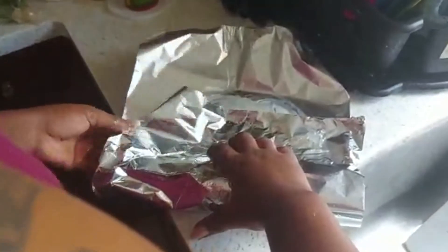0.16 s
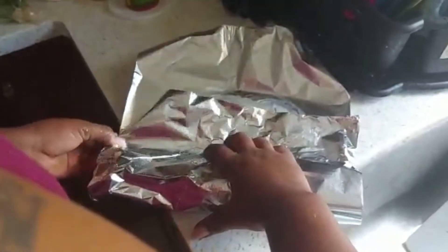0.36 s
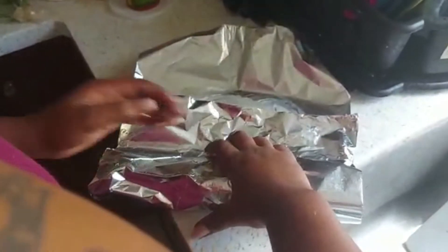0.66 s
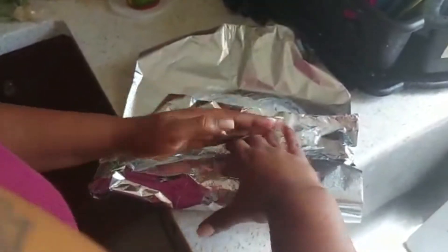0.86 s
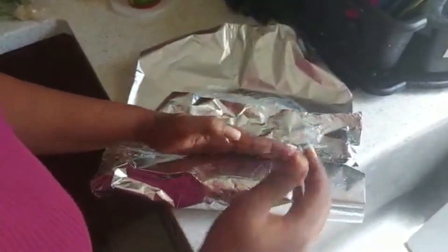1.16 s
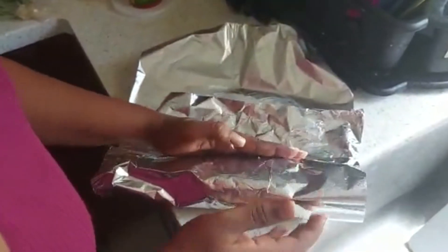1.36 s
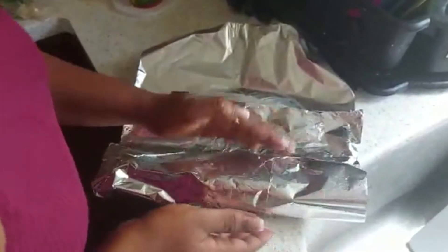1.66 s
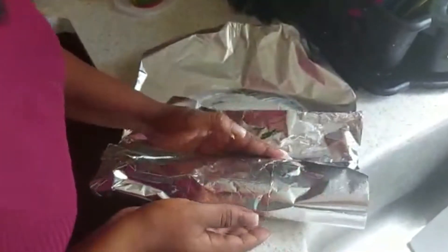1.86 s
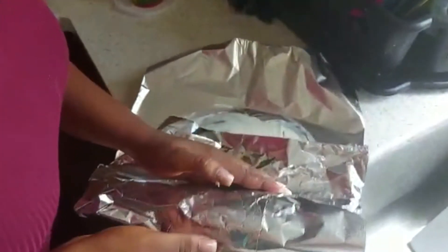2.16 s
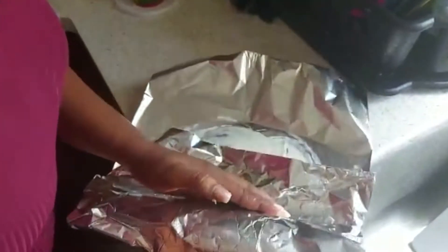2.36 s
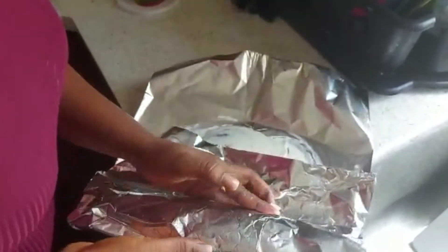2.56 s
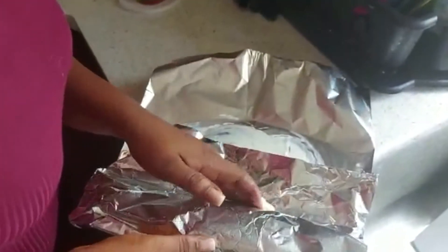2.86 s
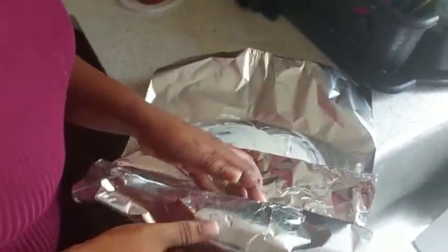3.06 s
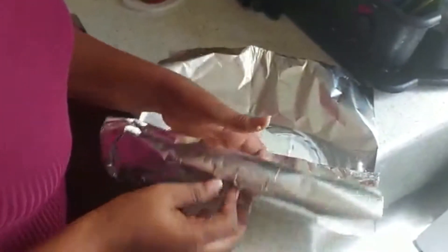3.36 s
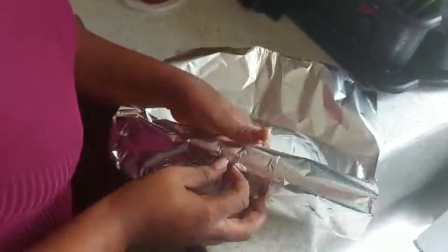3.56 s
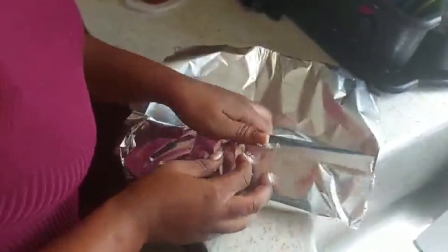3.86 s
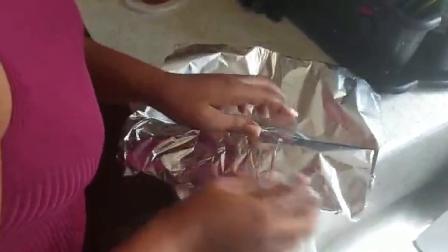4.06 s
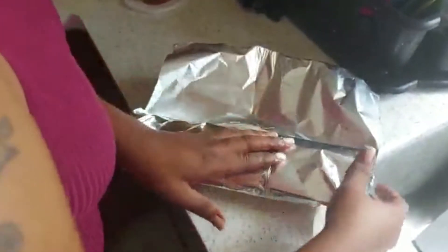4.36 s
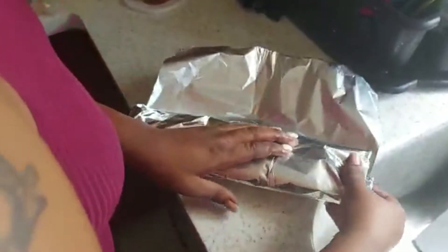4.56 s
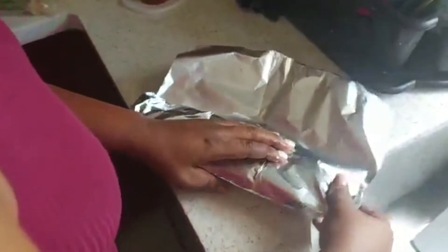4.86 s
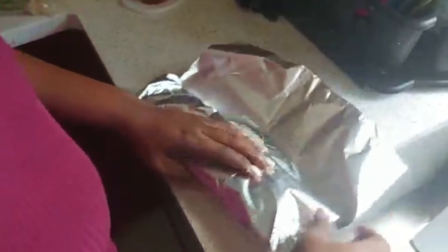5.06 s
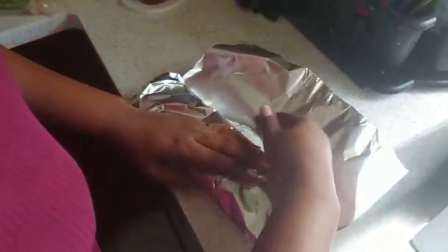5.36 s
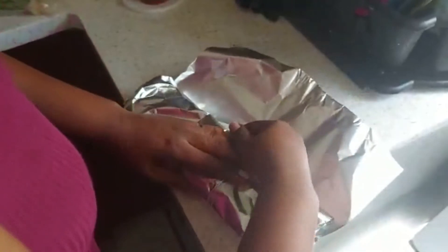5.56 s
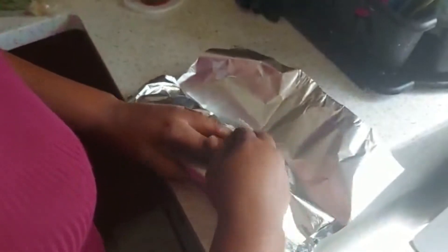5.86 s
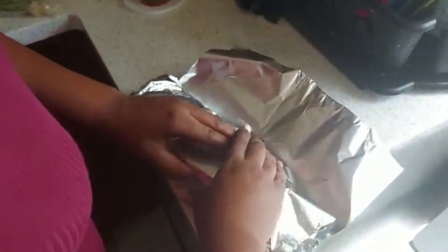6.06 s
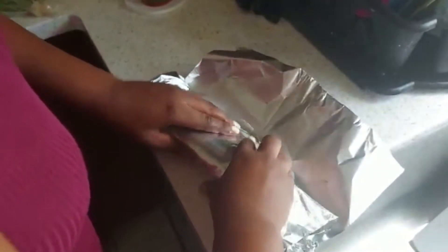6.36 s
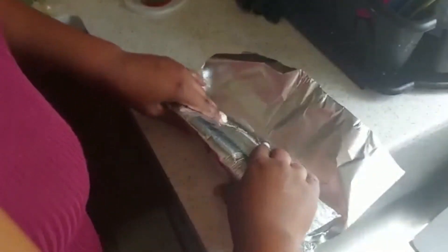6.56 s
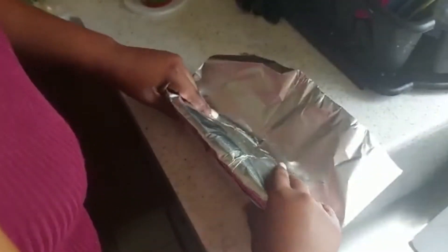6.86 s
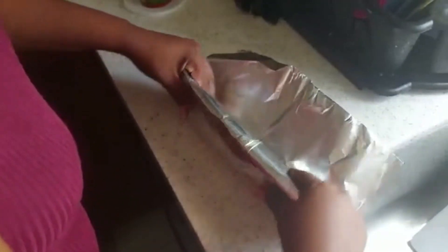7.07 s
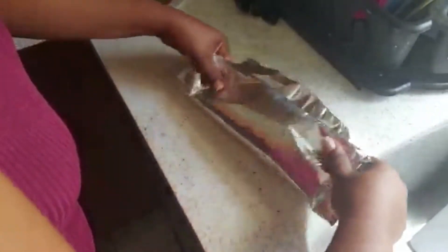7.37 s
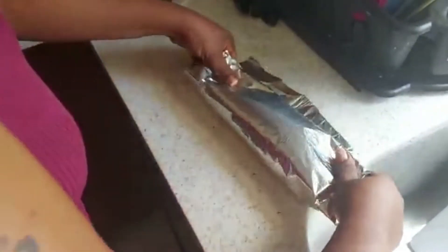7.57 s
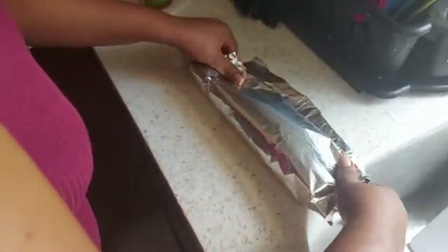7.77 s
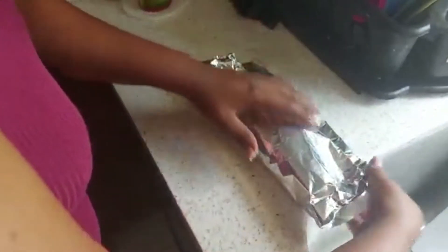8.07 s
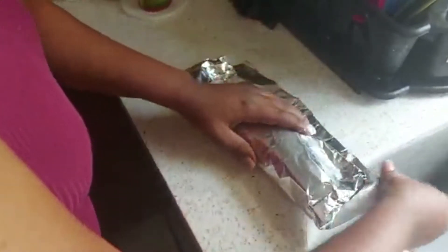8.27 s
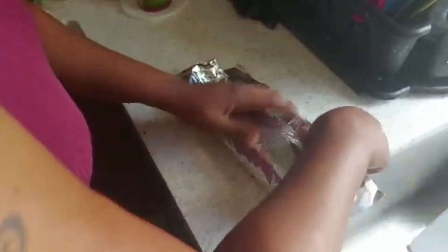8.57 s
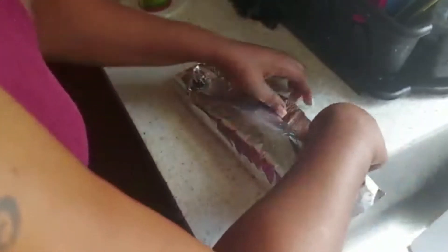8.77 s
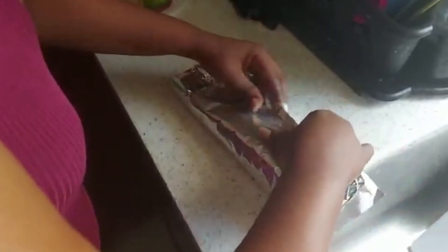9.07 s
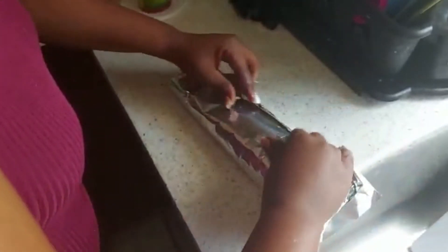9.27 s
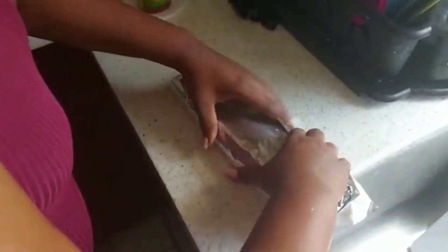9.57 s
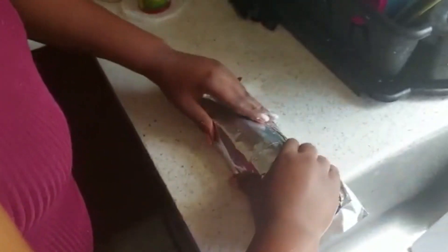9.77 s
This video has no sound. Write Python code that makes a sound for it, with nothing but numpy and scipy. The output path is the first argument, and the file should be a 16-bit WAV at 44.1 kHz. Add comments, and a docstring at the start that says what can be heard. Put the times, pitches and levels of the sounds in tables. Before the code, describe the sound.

Crisp aluminium foil crackles in irregular bursts as hands fold and crimp it in a small kitchen, over a faint low appliance hum.

```python
"""Crimping foil around food

Two hands fold and crimp aluminium foil on a plate in a small kitchen; the plate knocks once on the counter.
Foil: random flips and single impulses, each a tick plus dying noise, through facet resonances.
Plate: decaying sine modes and filtered noise. Appliance: resonant noise, two sines and a soft rush.
A low rumble of band noise swells twice, sinking in pitch each time. Foil and plate echo off the walls."""
import sys
import numpy as np
from scipy import signal
from scipy.fft import rfft, irfft
from scipy.io import wavfile
from scipy.ndimage import uniform_filter1d

SR = 44100
rng = np.random.default_rng(int(sys.argv[2]) if len(sys.argv) > 2 else 0)


def wav_record(signal):
    """Record a signal, one row per channel, as 16-bit PCM in the file named by sys.argv[1]."""
    frames = np.transpose(np.atleast_2d(signal))
    bounded = np.clip(frames, -1, 1)
    # unit amplitude maps onto the largest positive 16-bit level
    quanta = np.round(bounded * 32767).astype(np.int16)
    wavfile.write(sys.argv[1], SR, quanta)


N = 437913

# Presses and pinches of the fingers on the foil. Each row: start in seconds, length in seconds,
# crackle level in dB before band trims, finest wrinkles in dB relative to the crackle.
FINGER_PRESSES = [(0.0, 0.083, -37.5, -2.5), (0.057, 0.42, -36.5, -0.5), (0.722, 0.043, -48, -8),
                  (0.843, 0.032, -47, -12), (0.957, 0.082, -54.5, -1), (1.127, .1, -43.5, -7.5),
                  (1.231, 0.13, -39.5, -4), (1.55, 0.044, -43.5, 3), (1.708, 0.19, -35.5, -3.5),
                  (1.88, 0.47, -45, -2), (2.273, 0.023, -39, -3), (2.499, 0.12, -43, -0.5),
                  (2.613, 0.083, -40.5, -6), (2.813, 0.16, -51, -7), (3.0, .16, -41, -6),
                  (3.2, 0.33, -46, -1), (3.369, 0.081, -41, -2), (3.477, 0.15, -36.5, -2.5),
                  (3.66, 0.21, -42.5, -4), (3.846, 0.13, -39.5, -1), (3.937, 0.1, -36, -1),
                  (4.308, 0.1, -45.5, -4), (4.387, 0.21, -35, -2.5), (4.7, 0.086, -38.5, -0.5),
                  (4.818, 0.21, -42, -4), (4.995, 0.093, -38.5, -3), (5.109, 0.024, -39, -2),
                  (5.491, 0.064, -42.5, -4.5), (5.652, 0.034, -45.5, -3.5), (5.796, .02, -50, -11),
                  (5.869, 0.077, -43.5, -5.5), (5.974, 0.047, -42.5, -3.5), (6.12, 0.19, -42.5, -6.5),
                  (6.332, 0.29, -36.5, -4), (6.558, .12, -30.5, -6.5), (6.693, 0.12, -40.5, -3),
                  (6.845, 0.083, -37.5, -4), (6.902, 0.36, -37.5, -3.5), (7.237, 0.22, -33.5, -3),
                  (7.392, 0.14, -31.5, -1), (7.536, 0.17, -35, 0.5), (7.726, 0.15, -40.5, -6),
                  (7.864, 0.069, -35.5, 3.5), (8.041, 0.025, -34.5, 1), (8.097, 0.13, -33.5, -2.5),
                  (8.246, .11, -39.5, 0.5), (8.502, 0.084, -45.5, -4), (8.61, 0.096, -38.5, 1),
                  (8.767, 0.13, -47.5, -9), (8.877, 0.043, -34, 0.5), (8.932, 0.39, -41, 0.5),
                  (9.4, 0.066, -45.5, -6), (9.55, 0.15, -37.5, -0.5), (9.619, .15, -32, -7.5),
                  (9.773, 0.078, -36.5, -2.5), (9.879, 0.02, -38, 3)]
# Colour of the sheet. Each row: frequency in Hz, relative gain in dB.
SHEET_COLOUR = [(400, 6.5), (750, 3), (1200, 0), (2200, 1.5), (3000, -0.5), (4300, 5.5), (6000, 5),
                (8000, 1), (9800, 0.5), (12200, 6), (15000, -1.5), (16000, -19)]
# Faint rumble between the swells. Each row: time in seconds, level in dB.
RUMBLE_LEVEL = [(0, -45.5), (.75, -59), (1.2, -48.5), (2.3, -50), (4.2, -61), (4.7, -55), (5.4, -60),
                (6.5, -53), (9, -57), (9.93, -47)]
# Rumble swells, a higher one and then a deeper one. Each row: start in seconds, length in seconds,
# level in dB, nominal centre in Hz.
RUMBLE_SWELLS = [(1.554, 0.3, -40, 119), (1.88, 0.45, -52, 65), (8.024, 0.32, -39.5, 116),
                 (8.524, 0.24, -45, 60)]
# Hum resonances of the appliance. Each row: frequency in Hz, width of each of two passes in Hz, level in dB.
HUM_RESONANCES = [(296.8, 27.3, -53), (304, 78, -53), (440.6, 10.3, -61)]
# Deep motor drone. Each row: time in seconds, level in dB before trim and wander.
MOTOR_DRONE = [(0, -52), (.9, -59), (1.5, -49), (2.2, -59), (2.7, -50.5), (3.8, -53), (5.8, -63),
               (6.9, -54), (7.7, -58), (9.93, -59)]
# Colour of the soft rush. Each row: frequency in Hz, relative gain in dB.
RUSH_COLOUR = [(15, -52), (25, -7.5), (70, -13), (130, -4.5), (212, -10), (236, -5.5), (301, -4), (394, -9),
               (641, -11.5), (695, -16.5), (911, -14), (1370, -17), (4030, -21), (4610, -21), (16000, -36)]
# Single creases snapping through. Each row: time in seconds, energy in dB before trim, pitch in Hz,
# shimmer of the sheet in dB relative to the tick.
CREASE_SNAPS = [(0.069, 1, 6200, 12), (0.2908, 4, 5450, 5), (0.728, -8, 5440, 14), (0.9697, -5, 4140, 12),
                (1.0745, -8.5, 5500, 12), (1.233, 2, 4800, 10), (1.3371, 9.5, 11500, 12),
                (1.7535, 12.5, 6960, 12), (2.5103, -16, 4660, 11), (2.619, 3.5, 4560, 8),
                (2.824, -1, 4200, 8), (2.852, -4, 5450, 2), (2.99, 4, 4370, 5), (3.0085, 4, 4700, 7),
                (3.2054, 0, 6200, 12), (3.247, 0.5, 4900, 8), (3.2997, -8, 4800, -5),
                (3.4087, 4.5, 6100, 5), (3.866, -1, 11800, 10), (4.3956, -1, 11700, 14),
                (4.4105, 2.5, 4800, 14), (4.664, 1.5, 5470, 0), (4.6892, 3, 5500, -2),
                (4.758, 3, 12400, 12), (4.9278, -0.5, 4760, 7), (4.9722, 2, 11700, 10),
                (5.011, 3.5, 5500, 17), (5.1146, 4, 6160, 15), (5.494, -18, 4100, 5), (5.677, -11, 6060, 6),
                (5.8045, -6, 4550, 9), (5.873, -5, 12400, 5), (6.1344, -1.5, 11900, -2),
                (6.2597, 2.5, 12400, 3), (6.52, 4, 7500, 5), (6.854, -2.5, 5500, 9), (7.0916, 1, 5450, -3),
                (7.8313, 3, 4800, 6), (7.8896, 3, 5500, 12), (8.0514, 10, 6760, 13), (8.11, 8, 11900, 13),
                (8.1765, 3, 6140, -1), (8.492, -12, 11800, 10), (8.615, 1.5, 5030, 11),
                (8.7024, 4, 11700, 11), (8.882, 3, 12100, 10), (8.9808, 8, 6100, 7), (9.0623, 2, 11900, 8),
                (9.0975, 3, 4770, -6), (9.409, -1, 4760, 10), (9.546, -3, 6900, 10), (9.6418, 11, 5240, 13),
                (9.685, 6, 6200, 6), (9.8837, 1.5, 6900, 1)]
# Creases running across the sheet. Each row: start in seconds, level in dB before trim,
# decay time constant in seconds, pitch in Hz.
CREASE_RUNS = [(.075, -22, 0.021, 8100), (.143, -26, 0.015, 8000), (.202, -27, 0.013, 7000),
               (1.338, -19.5, .013, 11500), (1.563, -20, .011, 12500), (1.569, -17.5, 0.017, 8900),
               (1.748, -16, 0.012, 7600), (1.769, -18.5, 0.021, 6700), (3.125, -28, 0.018, 9900),
               (6.608, -25.5, 0.026, 7950), (6.947, -26, .012, 12000), (7.268, -19, 0.013, 11700),
               (7.403, -23, .02, 11000), (7.434, -23, 0.034, 10000), (8.259, -26, .016, 11500),
               (8.349, -25, 0.01, 11000), (9.06, -30, 0.008, 9900), (9.146, -27.5, 0.018, 10000),
               (9.213, -24, 0.0083, 6400)]
# Broad panels popping under the fingers. Each row: time in seconds, level in dB before trim, pitch in Hz.
PANEL_POPS = [(.307, -21.5, 1600), (1.757, -25, 1820), (2.296, -24, 2280), (2.914, -32, 2000),
              (3.007, -26, 1890), (3.205, -31, 1300), (3.614, -28, 1700), (5.114, -26.5, 1620),
              (6.437, -27, 1730), (6.481, -21, 1490), (6.571, -25, 710), (6.809, -25.5, 1790),
              (7.334, -19.5, 1730), (8.526, -25.5, 328), (8.53, -29.5, 1100), (8.788, -25, 1160),
              (9.11, -25, 2270), (9.603, -27, 1900), (9.65, -19, 1800), (9.687, -26, 1290)]
# Contacts of the plate with the counter. Each row: time in seconds, strength in dB.
PLATE_CONTACTS = [(8.053, -28.5), (8.058, -22.5), (8.062, -26.5), (8.068, -26)]
# Plate modes. Each row: frequency in Hz, level in dB relative to the contact, T60 in seconds.
PLATE_MODES = [(347, -18.5, 0.8), (397, 0, 0.25), (452, -11, 0.11), (512, -7.5, 0.37), (575, -25, 0.057),
               (645, -7, 0.3), (716, -25, 0.25), (788, -19, 0.3), (890, -4, 0.099), (1010, -33, 0.11),
               (1090, -21, 0.14), (1660, -27, .12)]

CUTOFF_HZ = 16000
CONTROL_STEP = 40   # samples between points of a slow control
ORDINARY_PRESS_DB = -37.5
PRESS_RISE_SHARE = 0.12   # of the press length
SETTLE_T60_S, SETTLE_T60_PER_LENGTH = .18, .3   # a longer press leaves the foil settling for longer
PANEL_DB, PANEL_FOLLOWS = -44.5, 0.78   # at an ordinary press; share of the press's swing followed
CREASE_TRIM_DB, WRINKLE_TRIM_DB = .5, 2.5
SNAP_TRIM_DB, RUN_TRIM_DB, POP_TRIM_DB = -5.5, 1.0, 5.5
SHIMMER_T60_S = .08
FOIL_PAN_DB, SNAP_PAN_DB, RUN_PAN_DB = 2.0, 2.5, 1.5   # left minus right; snaps at 6 kHz
SNAP_PAN_DB_PER_OCTAVE = 1   # higher snaps lean further to the left
RUN_RISE_SHARE = 0.37   # of the run's decay time
RUMBLE_HZ = 100
DRONE_HZ, DRONE_TRIM_DB = 72.1, -1.5
WHINE_HZ, WHINE_DB = 635.4, -60
RUSH_DB = -46
KITCHEN_T60_S, TREBLE_T60_S = 0.29, 0.28


def from_db(db):
    """Decibels to gain."""
    return np.exp(np.asarray(db) * (np.log(10) / 20))


def rms_one(x):
    """Scale to rms 1."""
    return x / np.sqrt(np.mean(x ** 2) + 1e-20)


def in_time(rows):
    """Curve columns at every sample."""
    s, *columns = np.transpose(rows)
    return [np.interp(np.arange(N) / SR, s, c) for c in columns]


def add(out, sound, s):
    """Mix a short stereo sound in at a time."""
    at = max(0, round(s * SR))
    out[:, at:at + sound.shape[1]] += sound[:, :max(0, N - at)]


def cut(x, hz, kind, order=2):
    """Butterworth filter."""
    sections = signal.butter(order, np.clip(hz, 10, .45 * SR), kind, fs=SR, output="sos")
    return signal.sosfilt(sections, x)


def resonate(x, hz, width_hz):
    """One resonance, gain 1 on top."""
    r = np.exp(-np.pi * width_hz / SR)
    zeros = [(1 - r * r) / 2, 0, (r * r - 1) / 2]
    poles = [1, -2 * r * np.cos(2 * np.pi * hz / SR), r * r]
    return signal.lfilter(zeros, poles, x)


def colour(x, spectrum, size=8192):
    """Causal (minimum-phase) filter with the given spectrum; rms 1."""
    hz, db = np.transpose(spectrum)
    grid_hz = np.maximum(np.arange(size // 2 + 1) * SR / size, 1)
    gain_db = np.interp(np.log(grid_hz), np.log(hz), db)
    cepstrum = irfft(np.log(from_db(gain_db)))
    response = irfft(np.exp(rfft(2 * cepstrum[:size // 2], size)))
    return rms_one(signal.oaconvolve(x, response[None], axes=1)[:, :N])


def panned(pan_db):
    """Left and right gains, for left minus right in dB."""
    return from_db(np.array([[.5], [-.5]]) * pan_db)


def stereo_noise(side_db):
    """White noise, mostly common to both sides."""
    mid, side = rng.standard_normal((2, N))
    return mid + from_db(side_db) * side * [[1], [-1]]


def drift(rate_hz):
    """Slow random wandering of spread 1."""
    r = np.exp(-2 * np.pi * rate_hz * CONTROL_STEP / SR)
    noise = rng.standard_normal(N // CONTROL_STEP + 2002)
    slow = signal.lfilter([1], [1, -2 * r, r * r], noise)[2000:]   # skip the filter's start
    return np.interp(np.arange(N) / CONTROL_STEP, np.arange(len(slow)), rms_one(slow))


def swell(s, length_s, rise_share, release_t60_s):
    """Attack, hold and release, as a gain at every control step."""
    t = np.arange(0, N, CONTROL_STEP) / SR - s
    attack = np.clip(t / (rise_share * length_s), 0, 1)
    return attack * from_db(-60 * np.maximum(t - length_s, 0) / release_t60_s)


def smooth(control):
    """Interpolate a stepped control to every sample."""
    return np.interp(np.arange(N), np.arange(0, N, CONTROL_STEP), control)


def buckle(flips, shimmer_db, t60_s):
    """Each flip is a sharp tick; its energy dies away in the crumpled sheet as a never-repeating shimmer."""
    r = from_db(-120 / (t60_s * SR))   # decay of energy, not amplitude
    energy = signal.lfilter([1 - r], [1, -r], flips ** 2 + 1e-18)
    shimmer = np.sqrt(energy) * rng.standard_normal((2, len(flips)))
    # the tick reaches the left side 0 to 5 samples late
    tick = np.array([np.roll(flips, rng.integers(0, 6)), flips])
    return tick + from_db(shimmer_db) * shimmer


def facet(x, hz, width, broad_db):
    """A facet favours its own pitch and radiates little far below it; white noise keeps its level."""
    hz = min(hz, CUTOFF_HZ)
    gain = np.sqrt(np.pi * width * hz / SR + from_db(2 * broad_db))
    ringing = resonate(x, hz, width * hz) + from_db(broad_db) * x
    return cut(ringing, 0.13 * hz, "high") / gain


def folding(resting_db=-68, resting_wrinkles_db=-75):
    """Crease and wrinkle levels in dB: presses add in energy, and resting hands still stir the foil."""
    creases, wrinkles = from_db(resting_db) ** 2, from_db(resting_wrinkles_db) ** 2
    for s, length_s, db, wrinkle_db in FINGER_PRESSES:
        settle_t60_s = SETTLE_T60_S + SETTLE_T60_PER_LENGTH * length_s
        press = from_db(db) * swell(s, length_s, PRESS_RISE_SHARE, settle_t60_s)
        creases = creases + press ** 2
        wrinkles = wrinkles + (press * from_db(wrinkle_db)) ** 2
    return smooth(10 * np.log10(creases)), smooth(10 * np.log10(wrinkles))


def clumping(clumps_per_s=70, clump_s=.004, between=.14):
    """Flips set each other off, crowding into bursts that start at once and die away; mean 1."""
    starts = (rng.random(N) < clumps_per_s / SR) * rng.uniform(.2, 1, N)
    crowd = signal.lfilter([1], [1, -np.exp(-1 / (clump_s * SR))], starts + 1e-18) + between
    return crowd / crowd.mean()


def crackle(busy_per_s=900, spread_db=3.0, largest=3.23, patchy_db=1.5, count=14):
    """Harder folding buckles more facets; small flips are common and large ones rare."""
    level_db, wrinkle_db = folding()
    effort_db = level_db - ORDINARY_PRESS_DB
    per_s = busy_per_s * from_db(.8 * effort_db) * clumping()
    sizes = from_db(spread_db * np.minimum(rng.exponential(1, N), largest))
    flips = (rng.random(N) < per_s / SR) * sizes * rng.choice([-1, 1], N)
    # the hands feed in energy steadily, so a large burst leaves less for its neighbours
    flips /= np.sqrt(np.abs(uniform_filter1d(flips ** 2, size=1800)) + 0.0014)
    dealt = rng.integers(0, count, N)
    sheet = np.zeros((2, N))
    for k, hz in enumerate(np.linspace(np.sqrt(1100), np.sqrt(15000), count) ** 2):
        # the fingers favour now this size of facet, now that one
        mine = flips * (dealt == k) * from_db(patchy_db * drift(20.5))
        buckled = buckle(mine, shimmer_db=5.5, t60_s=SHIMMER_T60_S)
        sheet += facet(buckled, hz, width=0.27 * np.sqrt(4000 / hz), broad_db=-12.5)
    sheet = colour(sheet, SHEET_COLOUR)
    panels = rms_one(cut(cut(sheet, 2580, "low", order=4), 350, "high"))
    panels = panels * from_db(PANEL_DB + PANEL_FOLLOWS * effort_db)
    creases = rms_one(cut(sheet, [2800, 8000], "band", order=4))
    creases = creases * from_db(level_db + CREASE_TRIM_DB)
    wrinkles = rms_one(cut(sheet, 9000, "high", order=4))
    wrinkles = wrinkles * from_db(wrinkle_db + WRINKLE_TRIM_DB) * panned(2.7)
    return (panels + creases + wrinkles) * panned(FOIL_PAN_DB)


def rumble_band(hz):
    """Nearly mono noise in a low band; rms 1."""
    return rms_one(cut(stereo_noise(-20), [0.56 * hz, 1.35 * hz], "band", order=3))


def rumble():
    """Faint low band noise that swells now and then, higher first and deeper after."""
    level_db, = in_time(RUMBLE_LEVEL)
    out = from_db(level_db) * rumble_band(RUMBLE_HZ)
    for s, length_s, db, hz in RUMBLE_SWELLS:
        envelope = smooth(swell(s, length_s, rise_share=0.3, release_t60_s=0.54))
        out += from_db(db) * envelope * rumble_band(hz)
    return out * panned(-3.1)


def motor_hum(waver_hz=0.9):
    """A motor's wavering drone and whine as sines, and narrow hum resonances driven by noise."""
    drive, (drone_db,) = stereo_noise(-15.0), in_time(MOTOR_DRONE)
    hum = np.zeros((2, N))
    for hz, width_hz, db in HUM_RESONANCES:
        hum += from_db(db) * rms_one(resonate(resonate(drive, hz, width_hz), hz, width_hz))
    for hz, db in ((DRONE_HZ, drone_db + DRONE_TRIM_DB), (WHINE_HZ, WHINE_DB)):
        phase = 2 * np.pi * np.cumsum(hz + waver_hz * drift(7.5)) / SR
        hum += np.sqrt(2) * from_db(db + 2.0 * drift(1.6)) * np.sin(phase)
    return hum * panned(1.0)


def soft_rush():
    """Coloured noise, mostly common to both sides in the bass and diffuse in the treble."""
    bass = cut(stereo_noise(-11.5), 545, "low")
    treble = cut(rng.standard_normal((2, N)), 740, "high")
    return from_db(RUSH_DB) * colour(bass + treble, RUSH_COLOUR)


def appliance():
    """Motor hum over a soft rush."""
    return motor_hum() + soft_rush()


def snaps(size=3500):
    """Stiff creases give way one at a time; they are too small to radiate below a few kilohertz."""
    out = np.zeros((2, N))
    for s, energy_db, hz, shimmer_db in CREASE_SNAPS:
        wave = buckle(signal.unit_impulse(size), shimmer_db, t60_s=0.067)
        wave = wave / np.hypot(1, from_db(shimmer_db))   # shimmer shares the energy with the tick
        wave = cut(facet(wave, hz, width=0.18, broad_db=-7.5), 2080, "high", order=3)
        pan_db = SNAP_PAN_DB + SNAP_PAN_DB_PER_OCTAVE * np.log2(hz / 6000)
        add(out, wave * from_db(energy_db + SNAP_TRIM_DB) * panned(pan_db), s)
    return out


def runs(per_s=6000, size=6000):
    """One buckle sets off the next: an avalanche that swells and dies in a few hundredths of a second."""
    out, t = np.zeros((2, N)), np.arange(size) / SR
    for s, level_db, decay_s, hz in CREASE_RUNS:
        flips = (rng.random(size) < per_s / SR) * rng.choice([-1, 1], size) * np.sqrt(SR / per_s)
        rise_s = RUN_RISE_SHARE * decay_s
        shape = np.minimum(t / rise_s, 1) * np.exp(-np.maximum(t - rise_s, 0) / decay_s)
        buckled = buckle(flips * shape, shimmer_db=-0.98, t60_s=0.054)
        wave = cut(facet(buckled, hz, width=1.0, broad_db=-27), 2700, "high")
        add(out, wave * from_db(level_db + RUN_TRIM_DB) * panned(RUN_PAN_DB), s)
    return out


def pops(size=3500):
    """Larger, slacker panels flip with a duller sound."""
    out = np.zeros((2, N))
    for s, db, hz in PANEL_POPS:
        buckled = buckle(signal.unit_impulse(size), shimmer_db=12.0, t60_s=0.093)
        wave = facet(buckled, hz, width=0.39, broad_db=-52)
        add(out, cut(wave, 1.56 * hz, "low") * from_db(db + POP_TRIM_DB), s)
    return out


def plate_knock(size=26000):
    """Each contact rings all the modes of the plate, with a short clatter on top."""
    out, t = np.zeros((2, N)), np.arange(size) / SR
    ring = sum(from_db(db - 60 * t / t60_s) * np.sin(2 * np.pi * hz * t) for hz, db, t60_s in PLATE_MODES)
    for s, db in PLATE_CONTACTS:
        clatter = rms_one(cut(rng.standard_normal(size), [350, 1150], "band", order=4))
        clatter = clatter * from_db(-5.5 - 60 * t / 0.12)
        add(out, from_db(db) * cut(ring + clatter, 230, "high", order=4) * panned(-0.6), s)
    return out


def kitchen(x, first_echo_s=0.0026, size=22000):
    """Dense reflections from hard walls; the treble dies first."""
    t, noise = np.arange(size) / SR, rng.standard_normal((2, size))
    body = cut(noise, 6300, "low") * from_db(-60 * t / KITCHEN_T60_S)
    treble = cut(noise, 15400, "high") * from_db(-60 * t / TREBLE_T60_S)
    tail = (body + treble) * np.minimum(t / first_echo_s, 1) ** 2
    return signal.oaconvolve(x, tail / np.sqrt(np.sum(tail ** 2) / 2), axes=1)[:, :N]


def scene():
    """Foil and plate in the kitchen, over rumble and hum."""
    foil = crackle() + snaps() + runs() + pops()
    knock = plate_knock()
    # as the hands move along the foil, the walls answer with a changing pattern of reflections
    place_rad = 2.03 * drift(5.2)
    sent = from_db(-5.0) * foil + from_db(-6.0) * knock
    walls = kitchen(sent * np.cos(place_rad)) + kitchen(sent * np.sin(place_rad))
    return foil + knock + walls + rumble() + appliance()


def record(dry):
    """Steep elliptic low-pass at the top."""
    return signal.sosfilt(signal.ellip(10, .2, 80, CUTOFF_HZ, fs=SR, output="sos"), dry)


dry = scene()
out = record(dry)
wav_record(out)
```